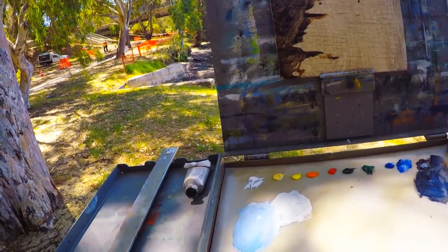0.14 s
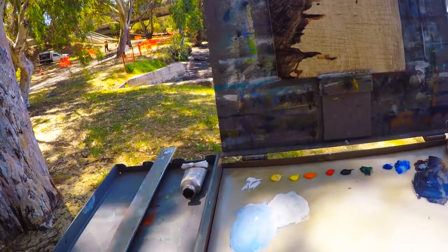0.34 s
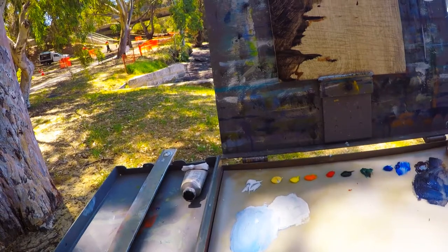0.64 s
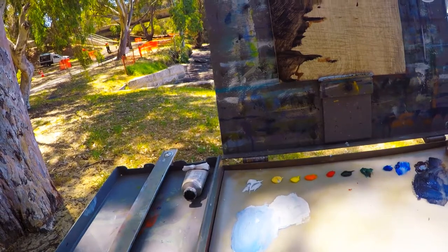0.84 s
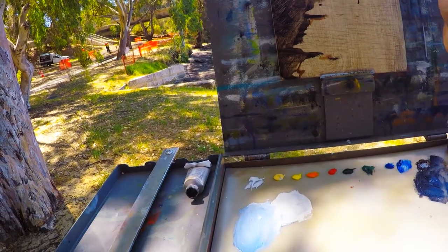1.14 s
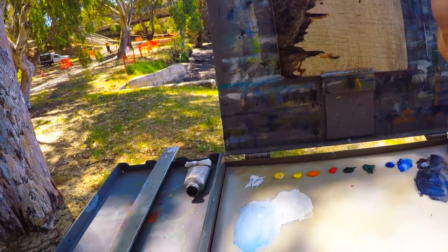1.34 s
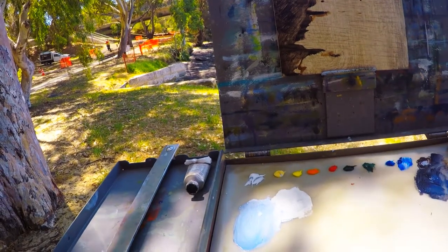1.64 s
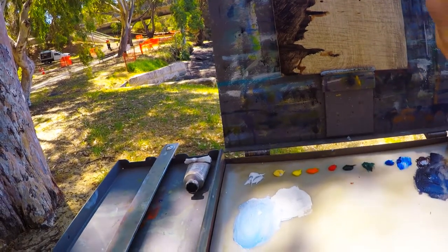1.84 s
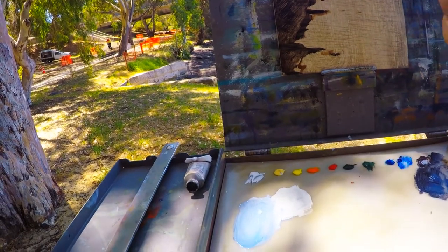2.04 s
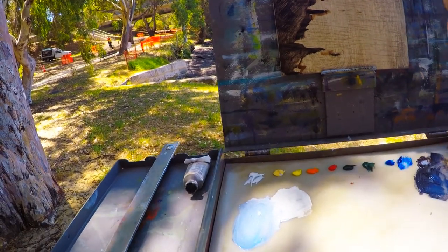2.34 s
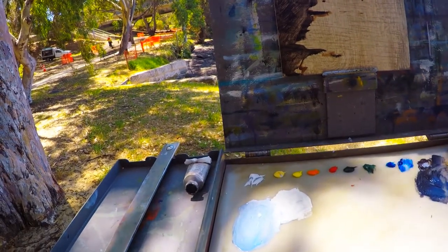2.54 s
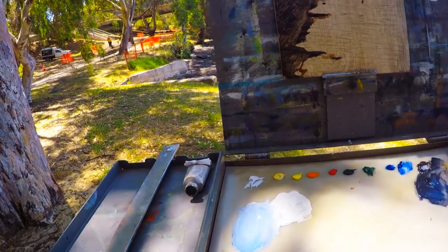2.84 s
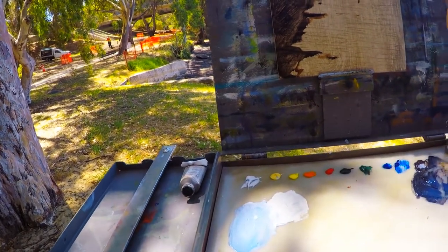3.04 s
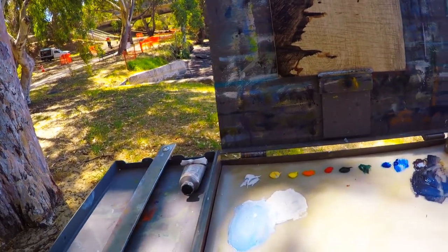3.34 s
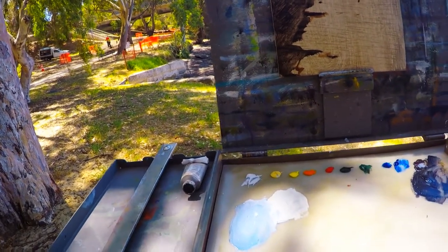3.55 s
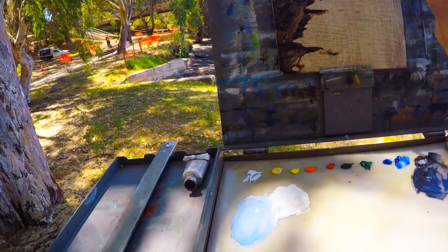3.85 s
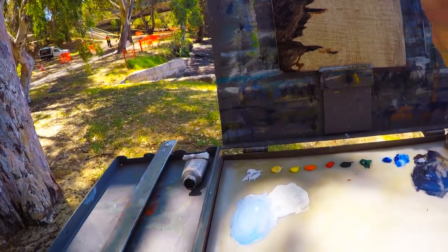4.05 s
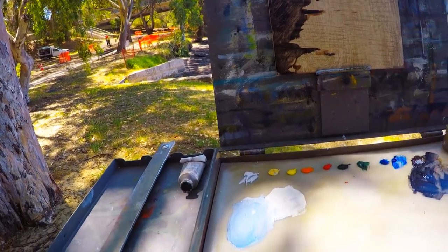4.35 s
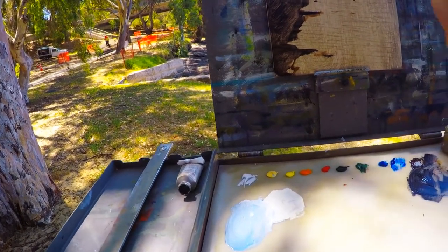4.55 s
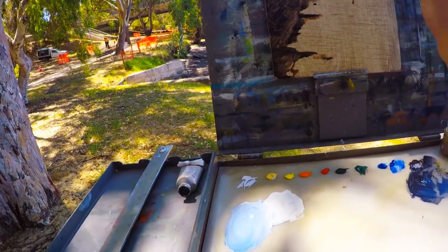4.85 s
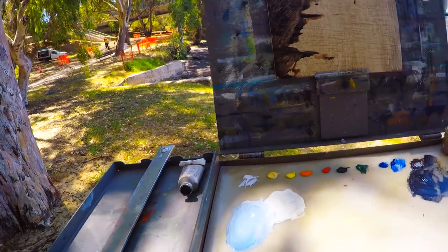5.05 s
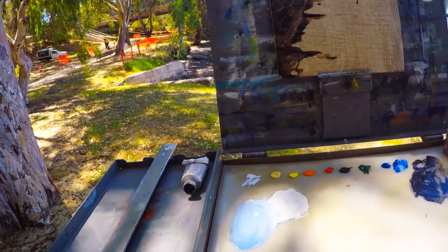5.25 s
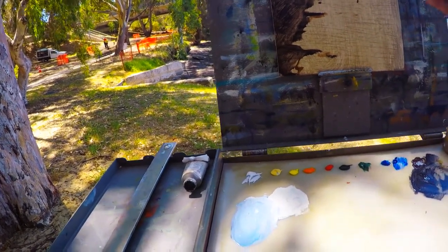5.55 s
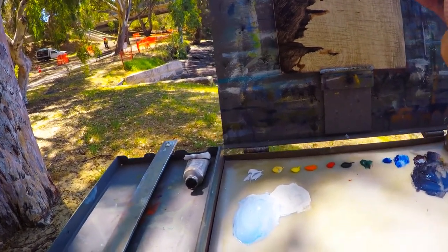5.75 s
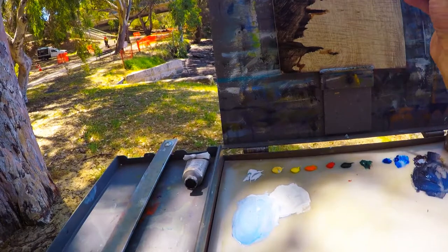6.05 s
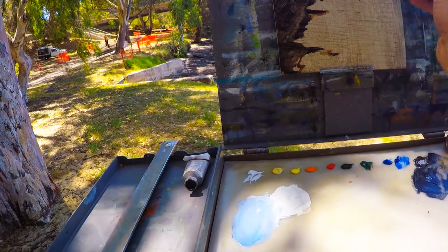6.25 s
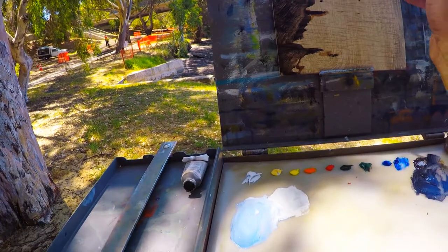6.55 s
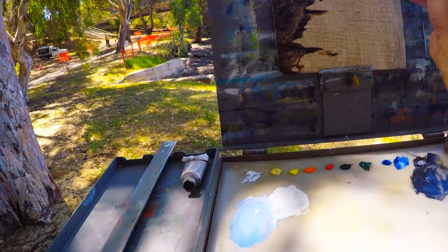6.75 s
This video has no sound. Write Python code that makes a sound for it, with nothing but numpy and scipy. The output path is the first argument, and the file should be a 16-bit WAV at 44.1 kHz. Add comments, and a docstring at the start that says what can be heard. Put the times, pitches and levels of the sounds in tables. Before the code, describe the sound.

Deep traffic rumble and chugging engines under regular soft thumps, while a wooden paint box is knocked, ticked and lightly brushed nearby.

```python
"""Road rumble near a bridge, under a knock and a low bump; a slow one-cylinder engine thuds and hums (pressure blasts).
A four-cylinder motor repeats one cycle of firings and clatter; the gear whine of a lorry drawing away sinks.
Painting gear close by knocks (decaying modes), bumps (low swings), brushes, ticks and scrapes (filtered noise).
Dull thumps, single pressure waves, come about every two thirds of a second; a bird whistles faintly and falls.
Two faint steady whines and a thin pulsing hiss run throughout."""
import sys
import numpy as np
from scipy import signal
from scipy.fft import rfft, irfft, next_fast_len
from scipy.io import wavfile
from scipy.ndimage import uniform_filter1d

SR = 44100
rng = np.random.default_rng(int(sys.argv[2]) if len(sys.argv) > 2 else 0)


def file_out(sig):
    """Save sig as 16-bit WAV at sys.argv[1]."""
    # one column per channel
    cols = np.atleast_2d(sig).T
    # limit, then scale
    lim = np.clip(cols, -1, 1)
    pcm = np.round(lim * 32767).astype(np.int16)
    wavfile.write(sys.argv[1], SR, pcm)


N = 303849
TIME = np.arange(N) / SR


def undb(db):
    """Gain of a level in dB."""
    return 10 ** (np.asarray(db) / 20)


def curves(table):
    """Columns of a table after its time column, interpolated to one value a sample."""
    time_s, *columns = np.transpose(table)
    return [np.interp(TIME, time_s, column) for column in columns]


def walk(rate_hz):
    """Random levels held 1 / rate_hz and slewed twice; spread near 1."""
    hold = int(SR / rate_hz)
    steps = np.repeat(rng.standard_normal(N // hold + 1), hold)
    return 1.57 * uniform_filter1d(uniform_filter1d(steps, hold), hold)[:N]


def resonate(x, hz, width_hz):
    """Band-pass with gain 1 at the centre."""
    return signal.lfilter(*signal.iirpeak(hz, hz / width_hz, fs=SR), x)


def resonate_twice(x, hz, width_hz):
    """Two equal band-passes in series, for steeper skirts."""
    return resonate(resonate(x, hz, width_hz), hz, width_hz)


def add(out, start_s, sound):
    """Mix a sound in from start_s, cut at the ends of out."""
    i = int(round(start_s * SR))
    part = out[max(i, 0):i + len(sound)]
    part += sound[max(-i, 0):][:len(part)]


def blast(width_s, suction, slow):
    """A push of pressure centred 20 ms in, then a suction that dies away slowly."""
    t = (np.arange(SR // 10) / SR - 1 / 50) / width_s
    late = np.logaddexp(0, 3 * (t - 1)) / 3 / slow
    return np.exp(-t ** 2 / 2) - suction * late * np.exp(1 - late)


# spectrum shape of road rumble and air: centre_hz, relative_density_db
ROAD_SPECTRUM = [(8.2, -39), (14, -3), (54, -1), (83, -2), (154, -7), (195, -10.5), (592, -21.5),
                 (1030, -32), (1800, -35), (2210, -37.5), (3630, -39), (5160, -45), (8740, -47.5),
                 (13500, -56.5), (15200, -59)]
# bands where the distant noise stands out: centre_hz, width_hz, lift_db
ROAD_PEAKS = [(293, 57, 1.5), (610, 180, 2.5), (1220, 146, 3), (1700, 540, 2.5), (2450, 150, 3),
              (3750, 200, 1.5), (10000, 3200, 4.5)]
# bass swell, full to 80 Hz and gone by 160 Hz: time_s, change_db
BASS_SWELL = [(0, 5.5), (.7, -6.5), (1.4, 5), (2.1, 1.5), (2.8, 3.5), (4.2, 2.5), (4.9, 2.5), (6.3, -5.5),
              (6.89, -7)]
ROAD_DB = -37.5  # rms before the swells
# tyre hiss of a car that has just gone by: lift at the start, 1/e decay
PASSED_DB, PASSED_S = 5, 0.38


def road():
    """Half-octave bands of noise; the traffic swells them together and each flickers alone."""
    size = next_fast_len(N)
    hz = np.maximum(np.arange(size // 2 + 1) * SR / size, 1)
    centre_hz, density_db = np.array(ROAD_SPECTRUM).T
    db = np.interp(np.log(hz), np.log(centre_hz), density_db)
    for peak_hz, width_hz, lift_db in ROAD_PEAKS:
        db = db + lift_db / (1 + (2 * (hz - peak_hz) / width_hz) ** 2)
    noise = rfft(rng.standard_normal(size)) * undb(db) / np.sqrt(np.mean(undb(db) ** 2))
    bass_db = curves(BASS_SWELL)[0]
    tyre_db = PASSED_DB * np.exp(-TIME / PASSED_S)
    gust = walk(3.47)
    place = np.clip(2 * np.log2(hz / 20), 0, 19)  # half octaves above 20 Hz
    out = 0
    for k in range(20):
        share = np.cos(np.pi / 2 * np.clip(place - k, -1, 1)) ** 2
        low = np.clip((6 - k) / 2, 0, 1)
        swell_db = bass_db * low + (1 - low) * tyre_db * (11 <= k < 17)
        flicker_db = .5 * gust + (0.45 + 0.66 * low) * walk(8)
        out = out + irfft(noise * share, size)[:N] * undb(swell_db + flicker_db)
    return out * undb(ROAD_DB)


def swells(table):
    """Soft swells of hiss in one band each; level_db is the rms at the crest."""
    out = np.zeros(N)
    for middle_s, half_span_s, hz, width_hz, level_db in table:
        size = int(half_span_s * 2 * SR)
        hiss = resonate_twice(rng.standard_normal(4 * SR), hz, width_hz)[:size]
        add(out, middle_s - half_span_s, undb(level_db) * np.hanning(len(hiss)) ** 2 * hiss / np.std(hiss))
    return out


# swells of the distant noise: middle_s, half_span_s, centre_hz, filter_width_hz, level_db
DISTANT_SURGES = [(.4, 1.18, 1250, 400, -58.5), (.4, 0.86, 280, 119, -53.5), (5.9, 1.22, 2480, 500, -65),
                  (6.7, .25, 292, 250, -49)]


def surges():
    """The distant noise swells in one band for a while."""
    return swells(DISTANT_SURGES)


# one-cylinder engine: time_s, blast_level_db, hum_db (each multiple)
SINGLE_LEVELS = [(0, -34.5, -56), (.8, -25, -40.5), (1.9, -26, -40), (2.25, -30, -46.5), (2.8, -23.5, -41),
                 (3.4, -26.5, -50), (4.25, -26, -42), (5, -27, -52), (6.89, -28.5, -54)]
SINGLE_HZ, SINGLE_FIRST_S, SINGLE_JITTER_S = 9.767, .083, .0004


def single():
    """One exhaust blast a cycle with a sharp tip, nearly on time and uneven in strength; two multiples hum on."""
    times_s = np.arange(SINGLE_FIRST_S, N / SR, 1 / SINGLE_HZ)
    chance = rng.standard_normal((len(times_s), 2))
    shape = blast(0.0023, suction=0.65, slow=2.13) + 0.31 * blast(.0012, suction=0.54, slow=1.0)
    out = np.zeros(N)
    for time_s, (late, strong) in zip(times_s, chance):
        add(out, time_s + SINGLE_JITTER_S * late - 1 / 50, undb(2.06 * strong) * shape)
    blast_db, hum_db = curves(SINGLE_LEVELS)
    turn = 2 * np.pi * SINGLE_HZ * (TIME - SINGLE_FIRST_S)
    hum = np.sqrt(2) * (np.sin(3 * turn) + np.sin(9 * turn))
    return out * undb(blast_db) + hum * undb(hum_db + 1.8 * walk(8))


# strongest multiples of the motor cycle: multiple -> level_db
MOTOR_MULTIPLES = {4: -42., 8: -52., 16: -61., 20: -68., 24: -63., 62: -79., 68: -79., 85: -76., 91: -77.,
                   93: -76., 95: -77., 98: -72., 102: -73., 133: -84.}
# valve clatter bands: centre_hz, width_hz, level_per_multiple_db
CLATTER_BANDS = [(1280, 590, -85), (1630, 206, -76), (1920, 360, -81.5), (2390, 400, -89),
                 (3050, 1700, -98)]
# clatter comes and goes on the air: time_s, change_db
CLATTER_LEVEL = [(0, -6), (.8, 2.5), (3.1, 1.5), (4.2, -2.5), (5.4, 1), (6.89, -2.5)]
MOTOR_HZ = 18.499  # mean cycle rate
MOTOR_FADE_S, MOTOR_FADE_DB_PER_S = 5.5, 4  # hum only


def motor():
    """Every cycle repeats the same firings and valve clatter, so all of it falls on multiples of the cycle."""
    order = np.arange(2049)
    power = 0
    for hz, width_hz, db in CLATTER_BANDS:
        power = power + undb(db) ** 2 * np.exp(-(2 * (order * MOTOR_HZ - hz) / width_hz) ** 2)
    size = np.sqrt(power) * undb(2.5 * rng.standard_normal(len(order)))
    size[list(MOTOR_MULTIPLES)] = undb(list(MOTOR_MULTIPLES.values()))
    turn = np.exp(2j * np.pi * rng.random(len(order))) * 2048 * np.sqrt(2)  # scales size to rms
    phase = np.cumsum(MOTOR_HZ * (1 + 0.000234 * walk(1.995)) / SR) % 1 * 4096
    fade_db = -MOTOR_FADE_DB_PER_S * np.clip(TIME - MOTOR_FADE_S, 0, None)
    clatter_db = curves(CLATTER_LEVEL)[0]
    out = 0
    for part, level_db in ((order < 30, fade_db), (order >= 30, clatter_db)):  # hum, clatter
        cycle = irfft(size * turn * part)
        wave = np.interp(phase, np.arange(4097), np.append(cycle, cycle[0]))
        out = out + wave * undb(level_db + 0.91 * walk(5))
    return out


# lorry gear whine: time_s, pitch_hz, level_db
LORRY_WHINE = [(0, 485, -66), (.9, 483.4, -59), (1.7, 481.4, -55), (2.35, 480.6, -54.5), (2.7, 480, -75),
               (4.3, 465.6, -68), (4.7, 464, -55.5), (5.9, 459.3, -59), (6.89, 452.3, -62.5)]


def lorry():
    """A gear whine that wavers on the air and sinks in pitch as it draws away."""
    pitch_hz, level_db = curves(LORRY_WHINE)
    phase = 2 * np.pi * np.cumsum(pitch_hz * (1 + 0.0021 * walk(10))) / SR
    return np.sqrt(2) * undb(level_db + 1.5 * walk(12)) * np.sin(phase)


# faint whines: pitch_hz, level_db
STEADY_WHINES = [(1289.5, -78), (1805.5, -77)]


def whines():
    """Sines of steady pitch whose levels waver slowly."""
    out = 0
    for hz, level_db in STEADY_WHINES:
        out = out + np.sqrt(2) * undb(level_db + 2.5 * walk(2.66)) * np.sin(2 * np.pi * hz * TIME)
    return out


PULSES_PER_S, PULSE_FIRST_S, PULSE_S = 30, 0.032, .013  # PULSE_S: width at 1/e
PULSE_HZ, PULSE_FILTER_WIDTH_HZ, PULSE_DB = 8530, 160, -69.5  # PULSE_DB: mean crest rms


def pulses():
    """A narrow high hiss gated into even pulses of uneven strength."""
    away_s = (((TIME - PULSE_FIRST_S) * PULSES_PER_S + .5) % 1 - .5) / PULSES_PER_S
    gate = np.exp(-(2 * away_s / PULSE_S) ** 2) * undb(1.5 * walk(20))
    hiss = resonate_twice(rng.standard_normal(N), PULSE_HZ, PULSE_FILTER_WIDTH_HZ)
    return undb(PULSE_DB) * gate * hiss / np.std(hiss)


def ring(hz, t60_s, push_s):
    """A mode that a soft push brings up and that then dies away."""
    t = np.arange(SR // 5) / SR
    return (1 - np.exp(-t / push_s)) * np.exp(-np.log(1000) * t / t60_s) * np.sin(2 * np.pi * hz * t)


# knocks on the wooden box: start_s, ring_level_db, crack_level_db
BOX_KNOCKS = [(0.0105, -29, -37.5), (0.464, -38, -38.5), (6.358, -32, -42)]
# ringing of the box: pitch_hz, relative_db, t60_s
BOX_RINGS = [(571, 1.5, 0.071), (1290, -7, 0.016), (2210, -7.5, 0.02)]


def knocks():
    """Hard taps ring the modes of the box and add a crack of band-limited noise."""
    rings, crack = np.zeros((2, N))
    t = np.arange(SR // 20) / SR
    for start_s, ring_db, crack_db in BOX_KNOCKS:
        box = sum(undb(db) * ring(hz, t60_s, 0.00043) for hz, db, t60_s in BOX_RINGS)
        add(rings, start_s, undb(ring_db) * box)
        add(crack, start_s - .001, undb(crack_db) * np.exp(-t / 0.0034) * rng.standard_normal(len(t)))
    band = signal.butter(4, [700, 6500], "band", fs=SR, output="sos")
    return rings + signal.sosfilt(band, crack)


# pressure swings of low bumps; the rows from .535 to .557 together make one bump: middle_s, level_db, pitch_hz
BUMP_SWINGS = [(0.0144, -24, 200), (.535, -22, 170), (.542, -26, 240), (.549, -29, 170), (.557, -25.5, 150),
               (.612, -29, 278), (.632, -29.5, 220), (5.9448, -24.5, 252), (6.653, -26, 239),
               (6.667, -27, 170), (6.6805, -23, 450), (6.694, -24, 200), (6.839, -26.5, 219)]
SWING_CYCLES = 0.89  # two standard deviations of the envelope


def bumps():
    """Low bumps built of short pressure swings, each a cosine under a bell; close swings join into one bump."""
    out = np.zeros(N)
    t = np.arange(SR // 20) / SR
    for middle_s, level_db, hz in BUMP_SWINGS:
        turns = hz * (t - 1 / 40)
        swing = np.exp(-(2 * turns / SWING_CYCLES) ** 2 / 2) * np.cos(2 * np.pi * turns - .5)
        add(out, middle_s - 1 / 40, undb(level_db) * swing)
    return out


# brush strokes: middle_s, half_span_s, centre_hz, level_db
BRUSH_STROKES = [(.11, .04, 5900, -67.5), (1.08, .14, 8500, -66), (1.518, .1, 8200, -72),
                 (2.75, .15, 8500, -67), (4.113, 0.13, 7200, -61), (4.557, .11, 8500, -65),
                 (4.92, .12, 8500, -67)]
BRISTLE_FILTER_WIDTH_HZ = 3600


def strokes():
    """The brush hisses in the band of its bristles."""
    return swells([(middle_s, half_span_s, hz, BRISTLE_FILTER_WIDTH_HZ, level_db)
                   for middle_s, half_span_s, hz, level_db in BRUSH_STROKES])


# ticks of the gear: time_s, level_db, mid_ring_relative_db
GEAR_TICKS = [(0.1605, -46, -8.5), (0.4422, -49, -4), (0.7713, -45, -5), (1.019, -47, -10),
              (1.7963, -53.5, -8), (2.1416, -44.5, -13), (2.2207, -52, -7), (2.34, -39.5, -9),
              (2.4587, -45, -12), (2.5959, -38, -8), (2.7108, -46.5, -13), (2.8518, -42.5, -9),
              (3.4949, -48, -5), (3.881, -45, -11), (4.104, -49, -8), (4.8432, -44, -7),
              (4.869, -49.5, -14), (5.0491, -42.5, -10.5), (5.618, -51, -6), (5.9079, -52, -12),
              (6.1614, -52, -13), (6.391, -44.5, -9), (6.655, -46, -10)]
# bright resonances of the gear: centre_hz, width_hz, relative_db
GEAR_MODES = [(5570, 200, -30), (6000, 170, -3.5), (6500, 420, -2.5), (7110, 160, -3), (8350, 600, 3),
              (9180, 710, -2.5), (9800, 5000, -9.5)]
TICK_RISE_S = 0.0093
TICK_LOW_DB = -6.5  # mean drive of the low ring relative to the tick


def ticks():
    """Short scratchy bursts that ring the same few resonances; fainter ones fall at random."""
    faint = rng.random((40, 2))
    rows = list(GEAR_TICKS) + [(N / SR * when, -60 + 7 * size, -9) for when, size in faint]
    t = np.arange(SR // 10) / SR
    decay = np.exp(-np.clip(t - TICK_RISE_S, 0, None) / 0.0091) + 0.17 * np.exp(-t / 0.033)
    envelope = np.clip(t / TICK_RISE_S, 0, 1) ** 1.1 * decay
    top, mid, low = np.zeros((3, N))
    for time_s, level_db, mid_db in rows:
        burst = undb(level_db) * envelope * rng.standard_normal((3, len(t)))
        add(top, time_s - .006, burst[0])
        add(mid, time_s - .007, undb(mid_db) * burst[1])
        add(low, time_s - .002, undb(TICK_LOW_DB + 1.6 * rng.standard_normal()) * burst[2])
    bright = 0
    for hz, width_hz, db in GEAR_MODES:
        bright = bright + undb(db) * np.sqrt(4000 / width_hz) * resonate(top, hz, width_hz)
    bright = signal.sosfilt(signal.butter(2, 5200, "high", fs=SR, output="sos"), bright)
    return undb(-10.5) * bright + undb(20) * resonate(mid, 3653, 72) + undb(16.5) * resonate(low, 1744, 216)


# drags across the box: start_s, level_db
BOX_SCRAPES = [(.399, -49.5), (.466, -53.5)]
# bands the drags ring: centre_hz, filter_width_hz, relative_db
SCRAPE_RINGS = [(3700, 210, -0.5), (4260, 2400, -3)]
SLIPS_PER_S = 1400  # mean
JERK_S, DRAG_S, DRAG_DB = .012, 0.1, -5.5  # 1/e decays; drag relative to jerk


def scrape():
    """Dense uneven slips that start with a jerk and ease off, ringing a narrow and a wide band."""
    out = np.zeros(N)
    t = np.arange(SR // 5) / SR
    effort = (1 - np.exp(-t / .003)) * (np.exp(-t / JERK_S) + undb(DRAG_DB) * np.exp(-t / DRAG_S))
    for start_s, level_db in BOX_SCRAPES:
        when, size = rng.random((2, len(t)))
        slips = (when < SLIPS_PER_S / SR) * (2 * size - 1) * np.sqrt(3 * SR / SLIPS_PER_S)  # unit rms
        add(out, start_s, undb(level_db) * effort * slips)
    return sum(undb(db) * np.sqrt(SR / np.pi / width_hz) * resonate_twice(out, hz, width_hz)
               for hz, width_hz, db in SCRAPE_RINGS)


# far thumps: peak_s, level_db
FAR_THUMPS = [(0.641, -23), (1.300, -28), (1.962, -19.5), (1.985, -21), (2.6411, -17.5), (3.318, -16),
              (4.005, -23.5), (4.707, -25), (5.358, -25), (6.024, -24.5)]
THUMP_WIDTH_S = .0034


def thumps():
    """Single low pressure waves, each a push and then a suction."""
    out = np.zeros(N)
    for peak_s, level_db in FAR_THUMPS:
        add(out, peak_s - 1 / 50, undb(level_db) * blast(THUMP_WIDTH_S, suction=0.81, slow=0.96))
    return out


# bird: start_s, length_s, level_db
BIRD_WHISTLES = [(1.25, 0.126, -75), (2.17, 0.19, -72), (3.28, 0.15, -75), (5.275, .19, -70)]
WHISTLE_START_HZ, WHISTLE_FALL_HZ_PER_S = 4520, 670  # before the wobble


def bird():
    """Thin falling whistles, blurred in pitch and level by the leaves on the way."""
    out = np.zeros(N)
    wobble, flutter = 1 + .004 * walk(60), undb(2.5 * walk(40))
    for start_s, length_s, level_db in BIRD_WHISTLES:
        hz = WHISTLE_START_HZ - WHISTLE_FALL_HZ_PER_S * TIME[:int(length_s * SR)]
        hz = hz * wobble[int(start_s * SR):][:len(hz)]
        tone = np.sqrt(2) * np.sin(2 * np.pi * np.cumsum(hz) / SR)
        add(out, start_s, undb(level_db) * signal.windows.tukey(len(hz), .4) * tone)
    return out * flutter


def scene():
    """Everything reaches one microphone in the open."""
    far = road() + surges() + single() + motor() + lorry() + whines() + pulses() + thumps() + bird()
    near = knocks() + bumps() + strokes() + ticks() + scrape()
    return (far + near)[None]


TOP_HZ = 15200


def record(dry):
    """The microphone drops the deepest bass and the recorder cuts the top."""
    dry = signal.sosfilt(signal.butter(1, 12, "high", fs=SR, output="sos"), dry)
    return signal.sosfilt(signal.ellip(10, .2, 70, TOP_HZ, fs=SR, output="sos"), dry)


dry = scene()
out = record(dry)
file_out(out)
```